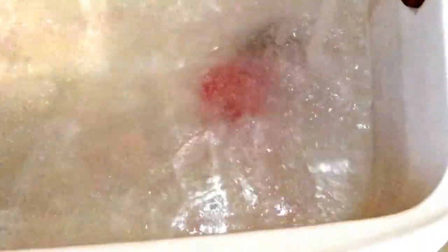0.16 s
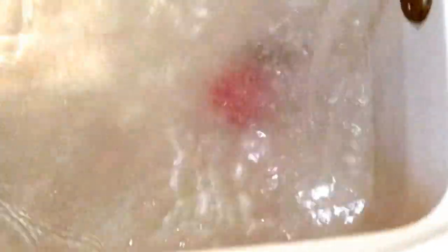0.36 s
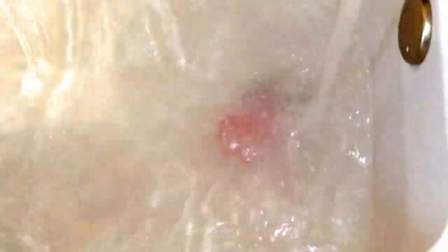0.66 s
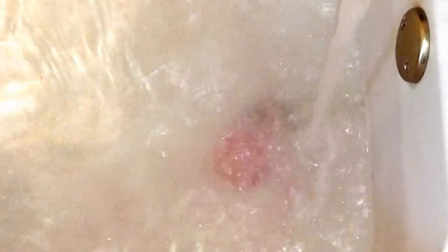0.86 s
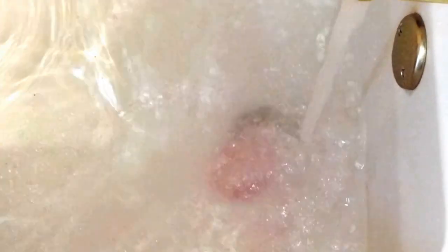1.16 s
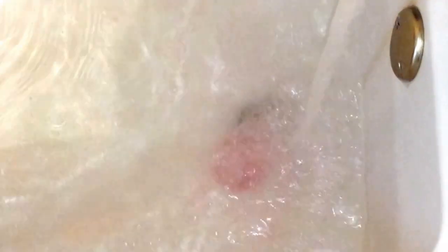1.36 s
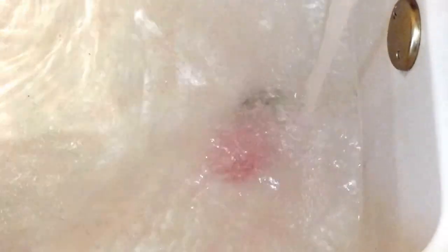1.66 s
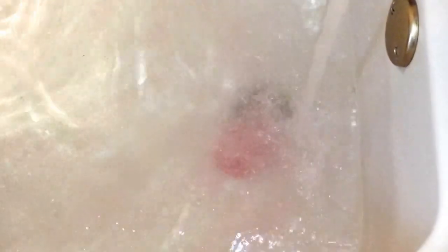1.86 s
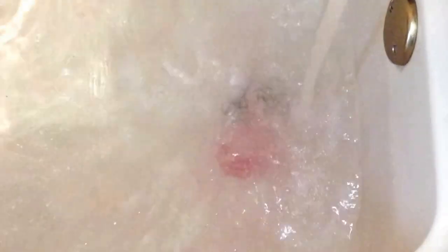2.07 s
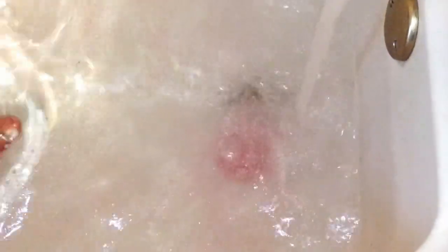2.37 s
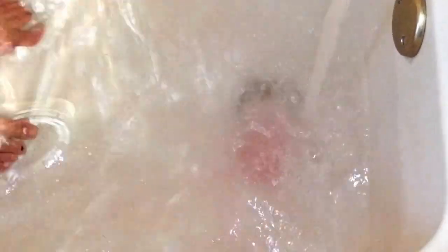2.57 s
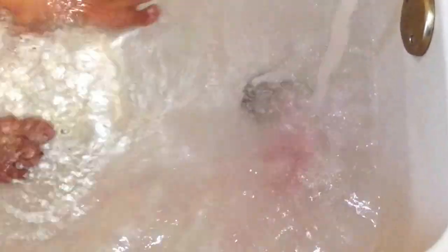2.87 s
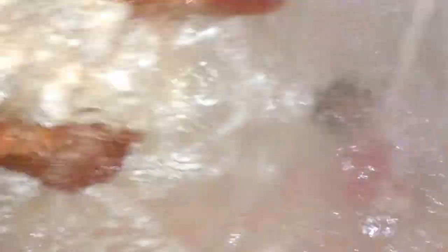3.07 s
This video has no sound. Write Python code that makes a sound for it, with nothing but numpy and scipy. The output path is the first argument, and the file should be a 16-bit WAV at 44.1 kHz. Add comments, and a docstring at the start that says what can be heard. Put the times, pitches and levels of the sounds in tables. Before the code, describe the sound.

Steady rush of tap water plunging into a bath, with bubbly gurgles, glugs and bright splashes

```python
"""Hard tap into a part-filled bathtub

Heard from close above: the jet drives a churning cloud of ringing, bursting bubbles in a smooth noise wash.
A few big glugs ring out as rising sine tones, and the tub booms along as noise lifted by its resonances.
Spray patters as random clicks with fine tails, fizzes with tiny bubbles and hisses as noise.
Sharper splashes are short bursts of grainy band noise; a thin sizzle comes briefly into the hiss.
The recorder feeds each channel's delayed treble, inverted, into the other to widen the stereo image."""
import sys
import numpy as np
from scipy import signal
from scipy.fft import rfft, irfft, next_fast_len
from scipy.io import wavfile

SR = 44100
rng = np.random.default_rng(int(sys.argv[2]) if len(sys.argv) > 2 else 0)


def digitize_waveform(pressure):
    """Quantize a signal to 16-bit integers and store it at the path in sys.argv[1].

    Rows of a 2-D input are taken as channels; values are limited to [-1, 1].
    """
    field = np.atleast_2d(pressure).T
    bounded = np.clip(field, -1, 1)
    quanta = np.round(bounded * 32767).astype(np.int16)
    wavfile.write(sys.argv[1], SR, quanta)


N = 141561   # length in samples
TIME = np.arange(N) / SR
HZ = np.maximum(np.arange(N + 1) * SR / (2 * N), 1)

# How hard the jet churns the water. Each row: time in seconds, level in dB before the churn trim.
CHURN_LEVEL = [(0, -23), (0.15, -27.5), (0.4, -25), (0.57, -21), (0.61, -26.5), (0.66, -28.5), (0.755, -30),
               (0.765, -25.5), (0.9, -25.5), (0.96, -28), (1.12, -25), (1.2, -29.5), (1.25, -26),
               (1.42, -26.5), (1.575, -23), (1.6, -33), (1.72, -29.5), (1.83, -26.5), (1.89, -27.5),
               (1.96, -23.5), (2.17, -25), (2.22, -22), (2.34, -22), (2.41, -24), (2.54, -20),
               (2.57, -26.5), (2.86, -26), (3.07, -29), (3.11, -32.5), (3.21, -29.5)]
# Colour of the churn before the tub lifts it. Each row: frequency in Hz, relative level in dB per Hz.
CHURN_COLOUR = [(80, -43), (170, -23), (240, -4), (300, -1), (380, -3), (550, -1.5), (770, 0.5), (930, -5),
                (1150, -12.5), (1800, -14), (2100, -20.5), (3000, -32), (6000, -47)]
CHURN_TRIM_DB = -1.31
POPS_PER_S, POP_SPREAD_DB = 1500, 1.5   # bubbles bursting in the churn
POP_DB, WASH_DB = -3, -3   # bursts and smooth wash, relative to unit white noise


def churn():
    """The plunging jet: large bubbles ring and burst in a smooth wash, coloured by the tub."""
    ringing = bubble_cloud(low_hz=218.4, high_hz=2834, cycles=37, rise=0.24, spread_db=0.8, count=2000)
    bursting = from_db(POP_DB) * rms_one(clicks(POPS_PER_S, POP_SPREAD_DB))
    wash = from_db(WASH_DB) * rng.standard_normal((2, N))
    water = rms_one(shaped(ringing + bursting + wash, tub_colour(CHURN_COLOUR)))
    return from_db(CHURN_TRIM_DB + in_time(CHURN_LEVEL)) * water


def bubble_cloud(low_hz, high_hz, cycles, rise, spread_db, count, size=3):
    """Bubbles of random time, pitch and strength, dealt to `size` spots; as strong per Hz as unit white noise."""
    spots = np.zeros((size, N))
    for when, pitch, strength, life, place in rng.random((count, 5)):
        hz = low_hz * (high_hz / low_hz) ** pitch
        boost_db = spread_db * min(-np.log(1 - strength), 4)
        ring = bubble(hz, cycles * (.5 + life), rise, attack_s=.5 / hz)
        add(spots[int(place * size)], when * N / SR, hz * from_db(boost_db) * ring)
    cloud = sum(from_spot(spot) for spot in spots)
    return rms_one(cloud) * np.sqrt(2 * (high_hz - low_hz) / SR)


def bubble(hz, cycles, rise, attack_s):
    """One bubble rings 60 dB down over some cycles and rises in pitch as it nears the surface."""
    life = cycles / hz
    t = TIME[:int(life * SR) + 2]
    turns = hz * t * (1 + rise * (t / life / 2 - .1))   # the pitch passes hz a tenth of the way through
    return np.sin(2 * np.pi * turns) * from_db(-60 * t / life) * (1 - np.exp(-t / attack_s))


# Big bubbles. Each row: start in seconds, strength in dB before the attack rounds it, pitch in Hz.
GLUG_EVENTS = [(0.384, -19, 1460), (0.553, -25, 720), (0.619, -20.5, 1420), (1.532, -20, 754),
               (1.571, -19.5, 1550), (2.012, -17.5, 1040), (2.077, -14, 770), (2.202, -17, 690),
               (2.239, -12.5, 698), (2.44, -13.5, 1165), (2.454, -16, 423), (2.502, -8, 790),
               (2.529, -10, 900), (2.53, -16, 1266), (2.745, -17, 1670), (2.863, -20.5, 1260)]
GLUG_CYCLES, GLUG_RISE, GLUG_ATTACK_S = 37, 0.15, 0.0012   # rise as a share of the pitch


def glugs():
    """Single big pockets of air ring out of the churn, all in the mid channel."""
    out = np.zeros((2, N))
    for start_s, db, hz in GLUG_EVENTS:
        add(out[0], start_s, from_db(db) * bubble(hz, GLUG_CYCLES, GLUG_RISE, GLUG_ATTACK_S))
    return out


# Level of the spray. Each row: time in seconds, level in dB before the spray trim.
SPRAY_LEVEL = [(0, -34), (0.1, -39), (0.15, -43), (0.27, -37), (0.47, -38), (0.53, -31.5), (0.6, -38.5),
               (0.67, -34), (0.75, -37.5), (0.83, -39), (0.91, -40.5), (1.06, -36.5), (1.57, -37.5),
               (1.6, -39.5), (1.71, -47.5), (1.81, -39), (1.9, -42), (1.96, -38), (2.37, -36), (2.41, -40),
               (2.48, -35), (2.73, -35.5), (2.98, -38.5), (3.11, -40.5), (3.16, -38.5), (3.21, -44)]
# Colour of the spray before its flurries. Each row: frequency in Hz, relative level in dB per Hz.
SPRAY_COLOUR = [(300, -46), (1200, 5), (2500, 4.5), (3400, -0.5), (4800, -1.5), (6400, -3), (7800, -1.5),
                (9500, -4.5), (12000, -8.5), (14000, -21.5), (15500, -32)]
SPRAY_TRIM_DB, HISS_DB, FIZZ_DB = 1.04, 0.5, 0.5   # hiss and fizz scale unit-noise strength
DROPS_PER_S, DROP_SPREAD_DB, DROP_CLUMP_DB = 650, 3.5, 4.5   # the rate before clumping
DROP_T60_S, DROP_TAIL_DB = 0.059, 1.5   # each drop breaks into finer droplets


def spray():
    """Drops patter in clumps, tiny bubbles fizz, and the finest mist hisses."""
    drops = clicks(DROPS_PER_S * from_db(DROP_CLUMP_DB * drift(16)), DROP_SPREAD_DB)
    # the power of the droplets jumps with each drop and dies away
    decay = from_db(-60 / (DROP_T60_S * SR)) ** 2
    power = signal.lfilter([1], [1, -decay], np.sum(drops ** 2, axis=0) + 1e-18)
    droplets = rms_one(np.sqrt(power) * rng.standard_normal((2, N)))
    patter = rms_one(rms_one(drops) + from_db(DROP_TAIL_DB) * droplets)
    fizz = bubble_cloud(low_hz=1497, high_hz=14020, cycles=110, rise=0.035, spread_db=2.5, count=2400)
    hiss = rng.standard_normal((2, N))
    mix = patter + from_db(FIZZ_DB) * fizz + from_db(HISS_DB) * hiss
    flurries = rms_one(patches(shaped(mix, from_db(over_hz(SPRAY_COLOUR))), count=12))
    return from_db(SPRAY_TRIM_DB + in_time(SPRAY_LEVEL)) * flurries


# Level of the spray's top octave against the rest. Each row: time in seconds, lift in dB.
SPRAY_TOP = [(0, 4), (0.57, 8), (0.66, -4), (0.98, -10), (1.15, 4), (1.5, 3), (2.05, 0), (2.5, -4.5),
             (2.85, 1)]
PATCHY_DB, PATCH_RATE_HZ, TOP_FROM_HZ = 2.5, 12, 11100   # half of the top lift applies at TOP_FROM_HZ


def patches(x, count):
    """Drops of like size come in flurries, so each band swells on its own; the top has its own level."""
    size = next_fast_len(N)
    spectrum = rfft(x, size)
    hz = np.linspace(0, SR / 2, spectrum.shape[1])
    centres = np.geomspace(2000, 14000, count)
    top_db = in_time(SPRAY_TOP)
    out = 0
    for centre, peak in zip(centres, np.eye(count)):
        db = PATCHY_DB * drift(PATCH_RATE_HZ) + top_db / (1 + (TOP_FROM_HZ / centre) ** 6)
        band = irfft(spectrum * np.interp(hz, centres, peak), size)[:, :N]
        out = out + from_db(db) * band
    return out


# Sharp splashes, plus two narrow rows (2.294 s and 2.645 s) for small bubbles, played as thin bands of noise. #
# Each row: start in seconds, level in dB before the splash trim, centre in Hz, # width in octaves, time to fall
# 60 dB in seconds.
SPLASH_EVENTS = [(0.01, -30, 8000, 1.5, 0.071), (0.0678, -23.5, 6060, 1, 0.1),
                 (0.149, -32, 11800, 0.57, 0.055), (0.263, -28, 11000, 0.54, 0.054),
                 (0.3681, -27, 6100, 1.4, 0.18), (0.583, -17, 6060, 2, 0.04),
                 (0.623, -31, 4400, 0.44, 0.071), (0.761, -22, 3220, 3, 0.069), (0.83, -28, 3750, 1.2, .08),
                 (1.2516, -31.5, 3630, 0.69, 0.13), (1.46, -28.5, 5800, 1, 0.1),
                 (1.575, -21.5, 10400, .8, 0.032), (1.738, -26.5, 10400, 0.55, 0.023),
                 (1.791, -32, 5440, 1.8, 0.066), (1.9589, -26, 3000, 3.5, .07),
                 (2.202, -27.5, 3360, 1.2, 0.13), (2.23, -31, 7500, 1.6, 0.059),
                 (2.294, -28, 4930, .2, 0.09), (2.375, -30, 10600, 0.59, 0.054),
                 (2.53, -22.5, 6100, 0.85, 0.084), (2.645, -33, 3400, 0.2, 0.16),
                 (2.6716, -27, 5100, 0.66, 0.056), (2.882, -23, 12500, .8, .012),
                 (2.8918, -26, 5460, 1.6, 0.14), (2.971, -30, 5500, 1.8, 0.14)]
SPLASH_TRIM_DB, SPLASH_GRAIN_DB, SPLASH_ATTACK_S = -3.5, -1, 0.0015


def splashes():
    """A slap of water starts at once and breaks up into grainy droplets of like size."""
    out, t = np.zeros((2, N)), TIME[:SR // 4]
    for start_s, db, hz, octaves, t60 in SPLASH_EVENTS:
        grains = rng.standard_normal((2, len(t))) * from_db(SPLASH_GRAIN_DB * drift(480)[:len(t)])
        edges = np.clip(hz * 2 ** (octaves * np.array([-.5, .5])), 100, .45 * SR)
        band = signal.butter(2, edges, "band", fs=SR, output="sos")
        grains = rms_one(signal.sosfilt(band, grains))
        attack = 1 - np.exp(-t / SPLASH_ATTACK_S)
        add(out, start_s, grains * attack * from_db(SPLASH_TRIM_DB + db - 60 * t / t60))
    return out


# Level of the tub's low boom. Each row: time in seconds, level in dB before the boom trim.
BOOM_LEVEL = [(0.0, -39), (0.47, -41), (0.5, -33), (0.74, -47.5), (0.79, -36.5), (1.08, -44.5),
              (1.26, -35.5), (1.72, -44), (2.33, -38.5), (3.21, -42.5)]
# Colour of the boom before the tub lifts it. Each row: frequency in Hz, relative level in dB per Hz.
BOOM_COLOUR = [(25, -27), (48, -32), (80, -17), (100, -19.5), (130, -3), (165, -8.5), (200, -1), (260, -5),
               (400, -25.5)]
BOOM_TRIM_DB = 0.5


def boom():
    """The tub drones under the weight of the jet: low noise through its resonances."""
    drone = rms_one(shaped(rng.standard_normal((2, N)), tub_colour(BOOM_COLOUR)))
    return from_db(BOOM_TRIM_DB + in_time(BOOM_LEVEL)) * drone


# Resonances of the tub and the air in it. Each row: frequency in Hz, width in Hz, lift in dB.
TUB_MODES = [(79.6, 32, 10.5), (126.3, 71, 8.5), (181.4, 26.5, 12.5), (257, 13.5, 5), (310, 21, 4.5),
             (342, 21, 7), (430, 41, 5.5), (597, 61, 1.5), (755, 30, 4), (1038, 26, 5.5), (1295, 39, 6),
             (1464, 33, 7), (1622, 23, 6.5), (1815, 58, 11)]


def tub_colour(points):
    """A spectrum lifted by the tub's resonances, as gain per frequency."""
    lift_db = sum(db / (1 + (2 * (HZ - hz) / width) ** 2) for hz, width, db in TUB_MODES)
    return from_db(over_hz(points) + lift_db)


# Level of a thin sizzle high in the hiss. Each row: time in seconds, level in dB.
SIZZLE_LEVEL = [(1.0, -72), (1.1, -47), (1.55, -50), (1.65, -77)]
SIZZLE_HZ, SIZZLE_WIDTH_HZ = 9100, 1700


def sizzle():
    """For about half a second the hiss carries a thin, high band of noise."""
    band = 1 / (1 + (2 * (HZ - SIZZLE_HZ) / SIZZLE_WIDTH_HZ) ** 2)
    return from_db(in_time(SIZZLE_LEVEL)) * rms_one(shaped(rng.standard_normal((2, N)), band))


ROOM_T60_S, ROOM_DB = 0.13, -1   # reflections: decay time, and energy against the direct sound


def from_spot(x):
    """One spot on the water, as mid and side: direct sound plus its own reflections from the tub walls."""
    t, angle = TIME[:SR // 8], 2 * np.pi * rng.random()
    paths = rng.standard_normal((2, len(t))) * from_db(-60 * t / ROOM_T60_S)
    paths *= from_db(ROOM_DB) / np.sqrt(np.sum(paths ** 2))
    paths[:, 0] += [np.cos(angle), np.sin(angle)]   # direct sound
    return signal.oaconvolve(x[None], paths, axes=1)[:, :N]


def clicks(per_s, spread_db):
    """Tiny impacts of random time, strength and direction, as mid and side."""
    strength = from_db(spread_db * np.minimum(rng.exponential(1, N), 4.5))
    hits = (rng.random(N) < per_s / SR) * strength
    angle = 2 * np.pi * rng.random(N)
    return hits * np.array([np.cos(angle), np.sin(angle)])


def drift(rate_hz):
    """Slow random wander with spread 1: noise through two equal low-pass poles, run at SR / 40."""
    r = np.exp(-80 * np.pi * rate_hz / SR)
    noise = rng.standard_normal(N // 40 + 2002)
    slow = signal.lfilter([1], [1, -2 * r, r * r], noise)[2000:]   # drop the filter's run-in
    return np.interp(np.arange(N) / 40, np.arange(len(slow)), rms_one(slow))


def from_db(db):
    """Decibels to gain."""
    return 10 ** (np.asarray(db) / 20)


def rms_one(x):
    """Scale to rms 1."""
    return x / np.sqrt(np.mean(x ** 2) + 1e-20)


def in_time(rows):
    """A curve at every sample."""
    return np.interp(TIME, *np.transpose(rows))


def over_hz(points):
    """A table at every frequency, joined along log frequency."""
    hz, value = np.transpose(points)
    return np.interp(np.log(HZ), np.log(hz), value)


def shaped(x, gain):
    """Filter by a gain per frequency."""
    return irfft(rfft(x, 2 * N) * gain)[..., :N]


def add(out, start_s, sound):
    """Mix a sound in at a time."""
    i = int(np.clip(start_s * SR, 0, N - 1))
    out[..., i:i + sound.shape[-1]] += sound[..., :N - i]


# Difference between the two microphone ports. Each row: frequency in Hz, gain of the side signal in dB.
PORT_SIDE = [(30, 10), (120, -9), (300, -7.5), (800, -9), (1300, -3), (2000, -2), (4000, -0.5),
             (15000, -0.5)]
# Balance of the ports. Each row: frequency in Hz, left minus right gain in dB.
PORT_BALANCE = [(60, -1.5), (700, -4), (1200, -3.5), (1800, 1.5), (2600, -14.5), (6000, -2.5), (14000, 6.5)]


def scene():
    """All the water, picked up by two close microphone ports."""
    mid, side = churn() + boom() + spray() + sizzle() + glugs() + splashes()
    side = shaped(side, from_db(over_hz(PORT_SIDE)))
    lean_db = over_hz(PORT_BALANCE) / 2
    return shaped(np.array([mid + side, mid - side]), from_db([lean_db, -lean_db]))


WIDEN_DELAY_S, WIDEN_FROM_HZ, WIDEN_SHARE = 0.0003894, 1060, .95
CUTOFF_HZ = 15200


def record(dry):
    """A widener subtracts the delayed treble of each channel from the other; the top is cut."""
    treble = WIDEN_SHARE / (1 + (WIDEN_FROM_HZ / HZ) ** 6)
    delay = np.exp(-2j * np.pi * HZ * WIDEN_DELAY_S)
    wide = dry - shaped(dry[::-1], treble * delay)
    return shaped(wide, 1 / np.sqrt(1 + (HZ / CUTOFF_HZ) ** 200))


dry = scene()
out = record(dry)
digitize_waveform(out)
```